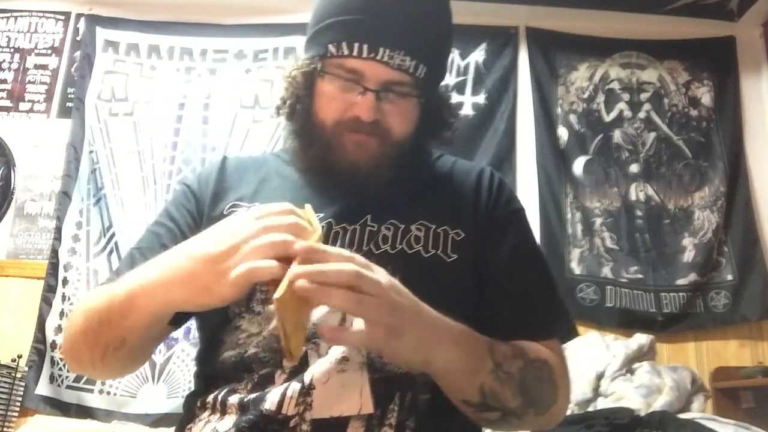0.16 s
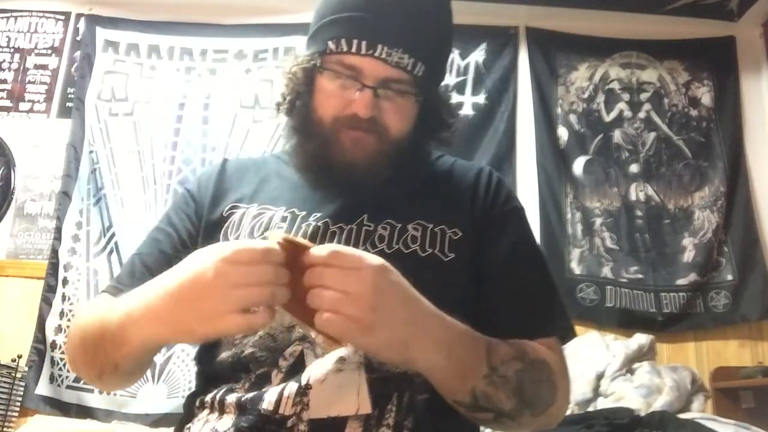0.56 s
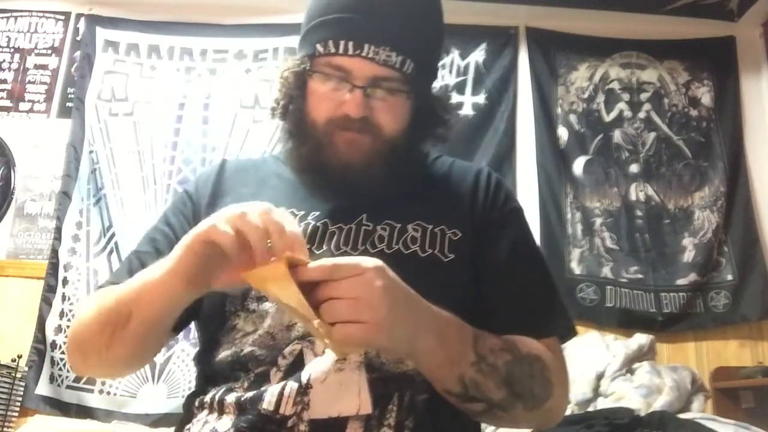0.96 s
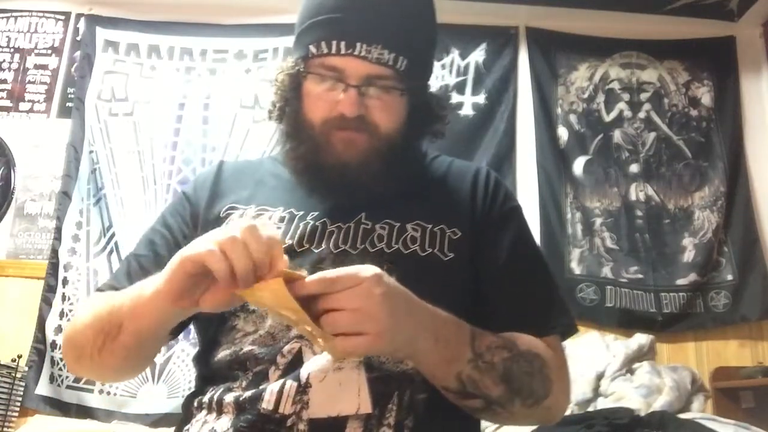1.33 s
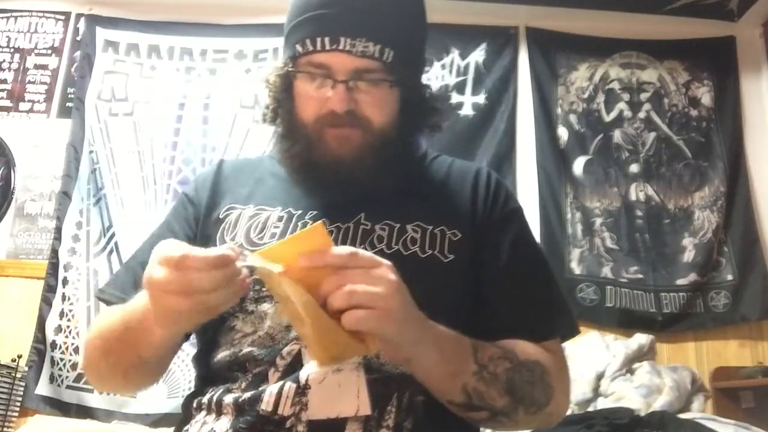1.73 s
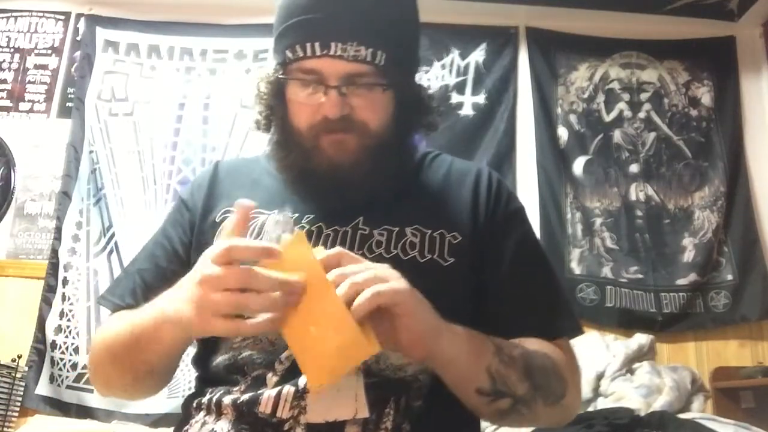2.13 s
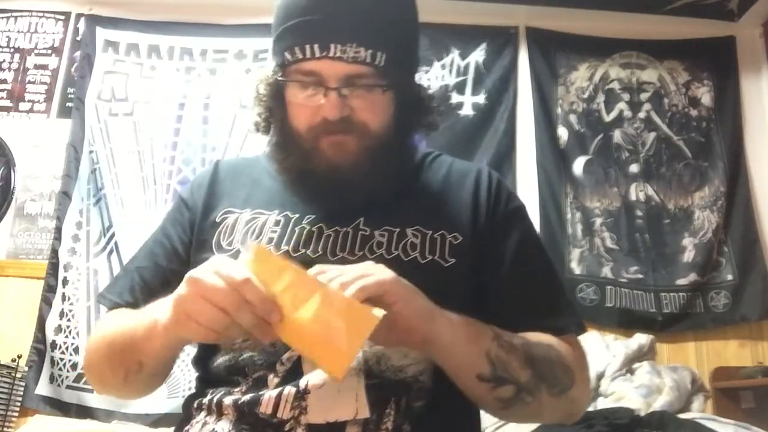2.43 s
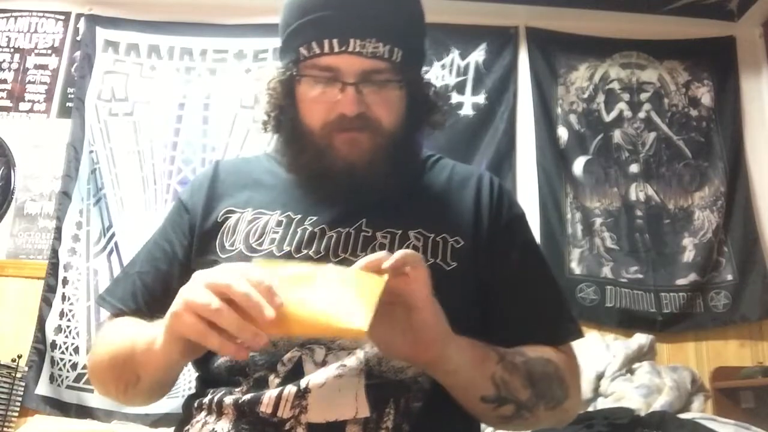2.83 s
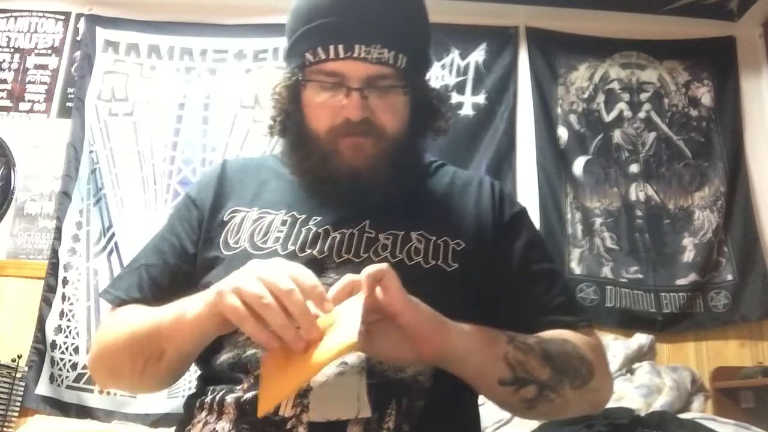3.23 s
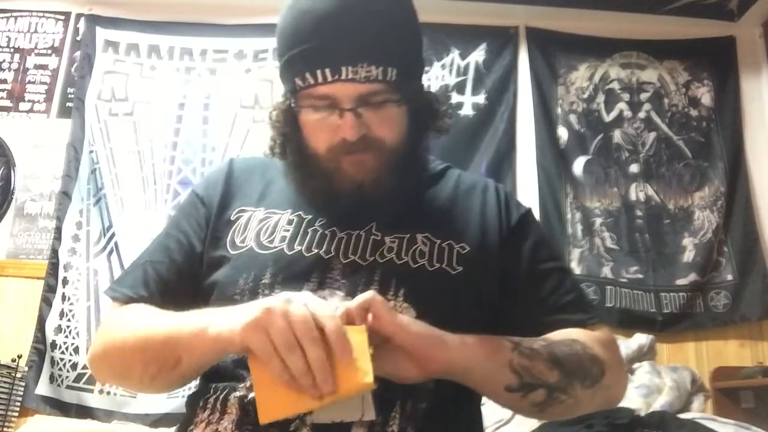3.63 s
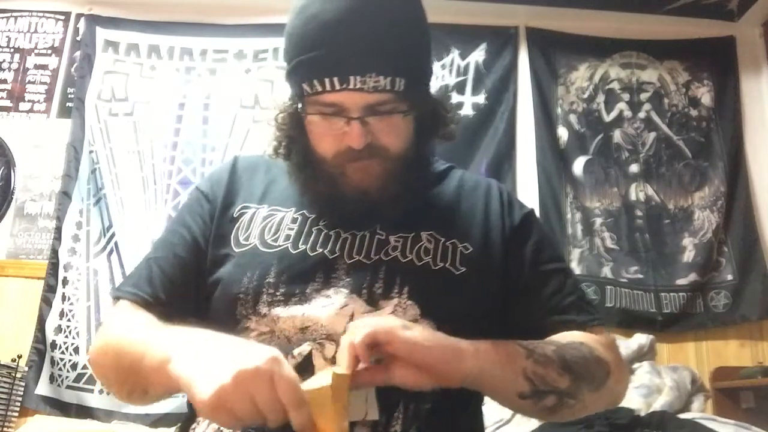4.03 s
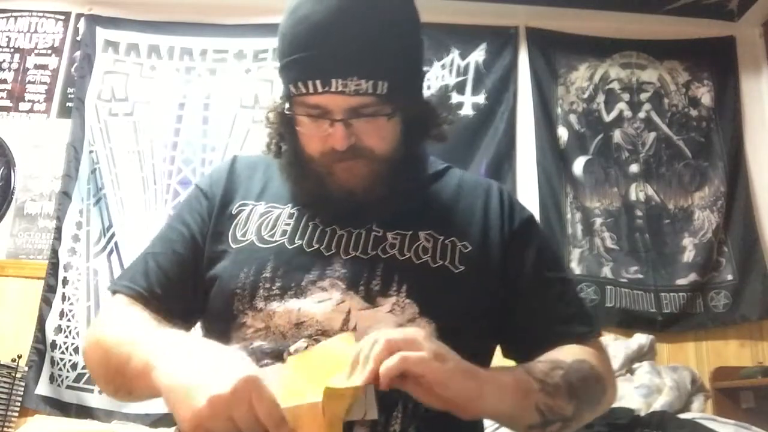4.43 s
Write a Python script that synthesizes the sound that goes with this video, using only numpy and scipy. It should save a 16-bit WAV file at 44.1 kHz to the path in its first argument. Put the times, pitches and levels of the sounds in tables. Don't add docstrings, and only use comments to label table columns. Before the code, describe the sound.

Irregular paper crinkling indoors: isolated hard snaps with short gaps, a brief rapid rip of parting fibres, then hollow pops and clicks as the opened envelope is flipped. The handling softens to dull dents and light rubbing, then a few firmer crackles and a thin paper-on-paper hiss. The microphone is fairly close, with short room reflections and a quiet background.

```python
import sys
import numpy as np
from scipy import signal
from scipy.fft import rfft, irfft
from scipy.io import wavfile
from scipy.ndimage import uniform_filter1d

SR = 44100
rng = np.random.default_rng(int(sys.argv[2]) if len(sys.argv) > 2 else 0)


def convert_level_to_amplitude(level_db):
    exponent = np.asarray(level_db, float) / 20
    return 10 ** exponent


def file_out(sig):
    cols = np.atleast_2d(sig).T
    lim = np.clip(cols, -1, 1)
    pcm = np.round(lim * 32767).astype(np.int16)
    wavfile.write(sys.argv[1], SR, pcm)


N = 201563


def unit(x):
    return x / np.sqrt(np.mean(x ** 2))


def band(x, lo_hz, hi_hz, order=3):
    sos = signal.butter(order, [lo_hz, hi_hz], "bandpass", fs=SR, output="sos")
    return signal.sosfilt(sos, x)


def tint(x, points):
    hz, db = np.transpose(points)
    grid = np.maximum(np.fft.rfftfreq(8192, 1 / SR), 1)
    ceps = irfft(np.log(convert_level_to_amplitude(np.interp(np.log(grid), np.log(hz), db))))
    ceps[1:4096] *= 2
    ceps[4097:] = 0
    response = irfft(np.exp(rfft(ceps)))
    return signal.fftconvolve(x, response)[:len(x)]


def fade(t, t60):
    return np.exp(-np.log(1000) * t / t60)


def place(times, shapes):
    out = np.zeros(N + shapes.shape[1])
    starts = (times * SR).astype(int)[:, None]
    np.add.at(out, starts + np.arange(shapes.shape[1]), shapes)
    return out[:N]


def set_peaks(shapes, db):
    return shapes * (convert_level_to_amplitude(db) / np.abs(shapes).max(axis=1))[:, None]


def walk(rate):
    hold = int(SR / rate)
    steps = np.repeat(rng.standard_normal(N // hold + 1), hold)[:N]
    return unit(uniform_filter1d(steps, hold))


# [dB per Hz, relative]
HUSH_COLOUR = [(22, -17), (40, -11), (55, 3), (110, -0.5), (400, -4.5), (900, -14), (1850, -12),
               (3200, -34), (6000, -13.5), (9000, -30.5), (15500, -21.5), (16000, -59)]


def hush():
    return unit(tint(rng.standard_normal(N), HUSH_COLOUR)) * convert_level_to_amplitude(-67)


# pitch_hz, t60_s
ROOM_DECAY = [(200, 0.21), (530, 0.19), (1400, 0.17), (3700, 0.14), (9700, 0.14)]


def room(x, wet_db, gap_s=0.0038):
    t = np.arange(SR // 3) / SR
    hz, t60 = np.transpose(ROOM_DECAY)
    tail = 0
    for mid_hz in 140 * 2 ** np.arange(7):
        widen = 1 + (mid_hz > 8000)
        hi_hz = min(mid_hz * 2 ** .5 * widen, 20000)
        noise = band(rng.standard_normal(len(t)), mid_hz / 2 ** .5, hi_hz)
        tail = tail + noise * fade(t, np.interp(np.log(mid_hz), np.log(hz), t60))
    tail = tail * np.clip(t / gap_s - 1, 0, 1)
    tail = tail / np.sqrt(np.sum(tail ** 2))
    return x + convert_level_to_amplitude(wet_db) * signal.fftconvolve(x, tail)[:N]


def shares(db, sharp_db, sparkle_db, sparkle_slope, thump_db, thump_slope):
    crack = db + sharp_db
    sparkle = db + sparkle_db + sparkle_slope * sharp_db
    thump = db + thump_db + thump_slope * sharp_db
    return crack, db, sparkle, thump


# low_hz, high_hz
BANDS_HZ = [(3200, 9400), (950, 2900), (9000, 16000), (200, 900)]
BAND_SLOPES_DB = [1, -0.13, -0.89, -0.93]


def crackle(gains, rate, scatter_db, smooth, patchy_db):
    chance = rng.random((N, 2))
    tick_db = np.minimum(-scatter_db * np.log(chance[:, 1] + 1e-9), 4 * scatter_db)
    ticks = (chance[:, 0] < rate / SR) * convert_level_to_amplitude(tick_db)
    kick = np.sign(chance[:, 0] * SR / rate - .5)
    out = 0
    for edges, gain, slope_db in zip(BANDS_HZ, gains, BAND_SLOPES_DB):
        noise = rng.standard_normal(N)
        rub = unit(ticks * (noise + kick)) + smooth * noise
        cuts = np.geomspace(*edges, 5)
        patches = 0
        for lo, hi in zip(cuts, cuts[1:]):
            swell_db = patchy_db * walk(rate=50.0) + slope_db * np.log2(lo / edges[0])
            patches = patches + convert_level_to_amplitude(swell_db) * band(rub, lo, hi, order=2)
        out = out + gain * unit(patches)
    return out


# time_s, level_db
SLIDE = [
    (4.08, -82),
    (4.27, -62),
    (4.44, -60),
    (4.57, -68),
]
# pitch_hz, width_hz, level_db
SLIDE_MODES = [(2150, 290, -13.5), (4080, 940, -7.5), (5900, 1300, -5), (8600, 1500, -11)]


def slide():
    s, db = np.transpose(SLIDE)
    noise = rng.standard_normal(N)
    hiss = 0
    for hz, width_hz, mode_db in SLIDE_MODES:
        hiss = hiss + convert_level_to_amplitude(mode_db) * unit(band(noise, hz - width_hz / 2, hz + width_hz / 2))
    level_db = np.interp(np.arange(N) / SR, s, db, left=-120)
    return unit(hiss) * convert_level_to_amplitude(level_db + 7.5)


# time_s, effort_db, sharpness_db
RUSTLE = [(0.0, -41.5, -1), (.22, -51.5, -6), (.69, -55, 6), (.83, -71.5, 0), (1.12, -49, -2),
          (1.28, -78, -5), (1.42, -44, -32), (1.551, -27, 6.5), (1.78, -69.5, -21.5), (2.19, -54.5, 4.5),
          (2.52, -38.5, -8), (2.74, -46.5, 1.5), (3.14, -51.5, -4.5), (3.28, -62, 5.5), (3.84, -43, -8),
          (3.97, -46.5, -4.5), (4.4, -61.5, 12.5), (4.57, -53, -19)]
# sparkle_db, slope [dB per dB of sharpness], thump_db, slope [dB per dB]
RUSTLE_EDGES = (-9.5, 2.2, -8.5, 2.2)


def rustle():
    s, effort_db, sharp_db = np.transpose(RUSTLE)
    t = np.arange(N) / SR
    grip_db = 3.0 * walk(rate=25.)
    gains = []
    for db in shares(effort_db, sharp_db, *RUSTLE_EDGES):
        gains.append(convert_level_to_amplitude(np.interp(t, s, db) - 14.5 + grip_db + 2.5 * walk(rate=46.0)))
    return crackle(gains, rate=630.0, scatter_db=3.0, smooth=1.0, patchy_db=3.)


# start_s, level_db, pitch_hz, t60_s
THUDS = [(1.57, -25, 300, .03), (1.581, -30, 240, .025), (1.576, -30, 150, .05), (1.728, -32, 150, .05),
         (1.745, -40, 250, .035), (2.768, -55, 1340, .12), (.785, -40, 260, .04), (4.49, -40, 330, .05),
         (2.5, -41, 135, .07), (4.062, -48, 360, .16), (2.168, -38, 270, .04), (3.68, -39, 210, .05),
         (.405, -40, 270, .04), (3.495, -48, 950, .12), (0.408, -40, 150, .06), (2.165, -40, 170, .06),
         (4.5, -38, 140, .08)]


def thuds():
    s, db, hz, t60 = np.transpose(THUDS)
    t = np.arange(9000) / SR
    soft_start = 1 - np.exp(-t / 0.0079)
    ring = np.sin(2 * np.pi * hz[:, None] * t) * fade(t, t60[:, None]) * soft_start
    return place(s, set_peaks(ring, db)) * convert_level_to_amplitude(3. * walk(rate=60.))


# start_s, peak_db, pitch_hz
POPS = [(.043, -46, 504), (.086, -44, 555), (.119, -44, 496), (0.406, -31, 440), (0.45, -38, 600),
        (0.584, -48, 590), (0.733, -32.5, 920), (0.796, -32.5, 950), (0.946, -49, 490), (0.985, -50.5, 514),
        (1.032, -47, 650), (1.725, -22.5, 940), (1.829, -39.5, 736), (1.862, -45.5, 466), (1.935, -22, 917),
        (2.16, -31, 830), (2.285, -37.5, 604), (2.33, -38, 320), (2.388, -29, 525), (2.605, -29, 540),
        (3.067, -39, 473), (3.273, -41.5, 452), (3.476, -42.5, 380), (3.678, -30, 520), (3.729, -42, 926),
        (4.298, -25.5, 910), (4.477, -26.5, 650), (4.519, -44, 820)]


def pops():
    s, db, hz = np.transpose(POPS)
    t = np.arange(2200) / SR
    turn = 2 * np.pi * hz[:, None] * t
    luck = rng.random((len(s), 2))
    near_mode = np.sin(turn * (0.975 + 0.22 * luck[:, :1]))
    low_mode = np.sin(turn * (0.64 + 0.22 * luck[:, 1:]))
    ring = np.sin(turn) + 0.77 * near_mode + 0.77 * low_mode
    ring = ring * fade(t * hz[:, None], 7.) * (1 - np.exp(-t / 0.011))
    return place(s + .0022, set_peaks(ring, db + 2.5))


# start_s, length_s, panel_db, sharpness_db
RIPS = [(0.006, 0.054, -53.5, -4.5), (0.114, 0.049, -48.5, -3), (0.251, 0.035, -53.5, 0.5),
        (0.485, 0.014, -33.5, -10), (0.565, 0.048, -84.5, 15), (0.685, 0.16, -53, -3.5),
        (0.747, 0.047, -50, -3), (1.12, 0.022, -52.5, 9.5), (1.244, 0.092, -42.5, 7),
        (1.333, 0.059, -53.5, 3.5), (1.423, 0.038, -56.5, 10.5), (1.503, .075, -39.5, 7),
        (2.01, 0.26, -58, 0.5), (2.263, 0.073, -44, 0), (2.523, 0.053, -54, -4),
        (2.957, 0.046, -49.5, -15.5), (3.046, 0.066, -48, 0), (3.243, 0.082, -58, 0.5),
        (3.455, 0.075, -49, -9.5), (3.589, 0.042, -53, 5), (3.664, .11, -43, -5.5),
        (3.772, 0.12, -49.5, -8), (3.979, 0.13, -55, -0.5), (4.292, 0.027, -39.5, 1), (4.426, 0.11, -51, 0),
        (4.534, 0.053, -37, -1.5)]
# sparkle_db, slope [dB per dB of sharpness], thump_db, slope [dB per dB]
RIP_EDGES = (0.5, 2, -4.5, -0.57)


def rips():
    s, length, panel_db, sharp_db = np.transpose(RIPS)[:, :, None]
    levels = shares(panel_db, sharp_db, *RIP_EDGES)
    t = np.arange(N) / SR
    edge_s = np.minimum(0.013 * convert_level_to_amplitude(0.53 * (-37.5 - levels[0])), length)
    on = np.clip(np.minimum((t - s) / 1.94, s + length - t) / edge_s + .5, 0, 1) ** 2
    jerk_db = 1.08 * walk(rate=420.0)
    gains = [convert_level_to_amplitude(jerk_db + 2.0 * walk(rate=100.0)) * (convert_level_to_amplitude(db[:, 0]) @ on) for db in levels]
    return crackle(gains, rate=2000., scatter_db=4.5, smooth=0.5, patchy_db=1.8)


def ticks(table, cycles, rise, fizz, trim_db):
    s, db, hz = np.transpose(table)
    lead = 120
    t = (np.arange(600) - lead) / SR
    turns = hz[:, None] * t
    luck = rng.random((len(s), 2))
    swell = np.where(turns < 0, np.exp(-(turns / rise) ** 2), fade(np.maximum(turns, 0), cycles))
    flip = (luck[:, :1] > .5) / 2
    ring = np.sin(2 * np.pi * (turns + 0.21 + flip))
    ring = ring + 0.16 * np.sin(2 * np.pi * turns * (1.19 + 1.4 * luck[:, 1:]))
    speck = np.diff(rng.standard_normal((len(s), len(t) + 1))) * np.exp(-np.abs(t) / 0.00018)
    return place(s - lead / SR, set_peaks(ring * swell + fizz * speck, db + trim_db))


# start_s, peak_db, pitch_hz
FIBRES = [(1.2543, -18, 4080), (1.2575, -12.5, 5900), (1.2602, -25, 4610), (1.2642, -24, 5600),
          (1.2699, -12, 4270), (1.2754, -39, 4500), (1.2783, -28, 5680), (1.2814, -19, 4350),
          (1.2857, -17, 4290), (1.2937, -7.5, 5400), (1.2968, -8, 5530), (1.303, -15, 7300),
          (1.3061, -15, 5940), (1.3168, -21, 9970), (1.3242, -16, 4290), (1.3282, -22, 5060),
          (1.3315, -17, 4690), (1.3697, -31, 5100), (1.3745, -21, 4260), (1.3921, -19, 4330),
          (1.3964, -11.5, 4460), (1.4, -15.5, 4130), (1.4049, -4.5, 4230), (1.4086, -9, 4080),
          (1.4111, -18, 4240), (1.4165, -28, 3680), (1.4287, -21, 4200), (1.4313, -17, 4110),
          (1.4354, -17, 4130), (1.4389, -14.5, 4180), (1.4431, -24, 4370), (1.4512, -16, 6980),
          (1.4601, -15, 5560), (1.4742, -17, 5640), (1.479, -27, 4640), (1.4835, -26, 3830),
          (1.5021, -34, 4840), (1.505, -15, 5280), (1.512, -29, 4300), (1.5155, -27, 3960),
          (1.5193, -6.5, 7340), (1.5221, -16, 5840), (1.5269, -19, 4430), (1.5339, -13, 4200),
          (1.5383, -7, 8070), (1.5412, -1, 8070), (1.544, -24, 4350), (1.5471, -28, 4300),
          (1.5552, -18, 4050), (1.561, -31, 5790), (1.5647, -17, 4100), (1.5672, -9.5, 6400),
          (1.5711, -12, 4050), (1.5762, -22, 4300), (1.5949, -32, 4160)]
# start_s, peak_db, pitch_hz
FACETS = [(0.1316, -22.5, 3020), (0.3411, -14, 4100), (0.3454, -32, 3270), (0.3562, -16.5, 3000),
          (0.3736, -30, 3230), (0.4066, -19.5, 4060), (0.4891, -31, 4570), (0.4988, -10, 4130),
          (0.5058, -24, 3670), (0.276, -38, 5860), (0.7368, -19, 4400), (0.7482, -40, 5570),
          (0.7524, -27, 3120), (0.7837, -40, 4100), (0.7958, -17, 5900), (0.802, -28, 4300),
          (1.0769, -38.5, 5500), (1.1278, -12, 11330), (1.1372, -41, 4390),
          (1.6795, -34, 4180), (1.6988, -33, 3060), (1.7119, -37, 3800), (1.7287, -4.5, 6720),
               (1.7366, -21, 5770), (1.747, -30, 7100), (1.938, -32, 3700), (2.041, -31, 4050),
               (2.0727, -14.5, 7460), (2.082, -12, 5670), (2.0941, -29, 3530), (2.1627, -27, 4100),
               (2.179, -33, 4260), (2.2655, -19.5, 6950), (2.2861, -30, 5770), (2.303, -26, 6140),
               (2.306, -20.5, 4900), (2.31, -25, 6140), (2.3498, -25, 3100), (2.3875, -24, 4280),
               (2.4634, -31, 3050), (2.513, -27, 3080), (2.5311, -16, 3970), (2.5361, -20, 3400),
               (2.5468, -20, 6330), (2.5521, -21, 5340), (2.5706, -14, 7500), (2.577, -25, 5380),
               (2.6062, -27, 4500), (2.6139, -25, 5300), (2.623, -20, 3680), (2.651, -35, 5700),
               (2.6662, -11.5, 3870), (2.678, -13, 3430), (2.6825, -18.5, 3100), (2.768, -25, 3040),
               (2.9906, -31, 3930), (3.0918, -27, 6400), (3.181, -49, 5300), (3.4977, -22.5, 5700),
               (3.6784, -38, 3100), (3.696, -24, 4080), (3.7093, -31, 5050), (3.743, -21, 3600),
               (3.8107, -29.5, 3790), (3.8418, -22, 3160), (3.895, -20.5, 3730), (4.012, -44, 3200),
               (4.0554, -31, 6520), (4.3008, -21, 3660), (4.3078, -19, 5800), (4.3124, -19, 6000),
               (4.3178, -19.5, 3170), (4.3318, -29, 3380), (4.4767, -18, 3100), (4.5518, -17.5, 3200),
               (4.5583, -22, 3220), (4.5666, -33, 4090)]
# start_s, peak_db, pitch_hz
DENTS = [(2.2919, -27, 1300), (2.3298, -28, 2130), (2.4153, -45, 1820), (2.472, -40, 1340),
         (2.5188, -28, 1050), (2.6205, -40, 1460), (2.6453, -30, 720), (2.6824, -19, 1130),
         (2.7269, -40, 1280), (2.9242, -25, 1720), (3.0812, -26.5, 1830), (3.0928, -29, 2240),
         (3.1055, -27, 2020), (3.2041, -41, 1990), (3.259, -32, 1900), (3.4666, -30, 1440),
         (3.5087, -39, 1710), (3.5265, -28.5, 1490), (3.6144, -31, 2200), (3.6666, -30, 1750),
         (3.7314, -27, 2150), (3.7696, -34, 1350), (3.7765, -36, 1400), (3.8177, -36, 1380),
         (3.9024, -27, 2010), (3.9154, -33, 1850), (4.0336, -30, 1870), (4.1232, -37.5, 1610),
         (4.2739, -31.5, 1570), (4.3244, -36, 1200), (4.4333, -32, 1870), (4.4911, -25, 1590),
         (4.5041, -22.5, 750), (4.5227, -33, 1660), (4.5337, -30, 1830)]
FLICK_CYCLES = (14., 16., 12.)


def flicks():
    fibre_cycles, facet_cycles, dent_cycles = FLICK_CYCLES
    fibres = ticks(FIBRES, fibre_cycles, rise=0.91, fizz=0.78, trim_db=-1.5)
    facets = ticks(FACETS, facet_cycles, rise=0.58, fizz=0.26, trim_db=-4.0)
    dents = ticks(DENTS, dent_cycles, rise=0.57, fizz=0.046, trim_db=-7.0)
    return fibres + facets + dents


# start_s, ring_db, pitch_hz, sharpness_db
GRIP = [(.0877, -37, 1590, -20), (.1323, -21, 1620, -30), (.1446, -28, 1640, -32), (.1748, -36.5, 2160, 1),
        (.2662, -37, 1760, 2), (.3411, -7.5, 1865, 3), (.406, -22, 1760, -1.5), (.4499, -27.5, 2420, -13),
        (.4896, -20.5, 1193, -9), (.499, -15.5, 2100, 8.5), (.7226, -28, 1200, -14),
        (.7369, -8.5, 2460, -1), (.7842, -22.5, 1450, -8), (.7969, -20, 1487, 4.5), (.8252, -42, 1620, 4),
        (.949, -55.5, 1020, -17), (1.0165, -41.5, 1100, -9), (1.0765, -58, 1910, 24.5),
        (1.1265, -37.5, 1950, 9), (1.1371, -28, 1980, -2), (1.2197, -70.5, 1920, 31.5),
        (1.231, -55, 2480, 9)]
# start_s, ring_db, pitch_hz, sharpness_db
TEAR = [(1.276, -29, 1960, 14.5), (1.2826, -24, 1710, 11), (1.2976, -22, 1420, 10.5),
        (1.3159, -20, 1435, 10), (1.3237, -23, 1650, 8), (1.37, -27.5, 1600, 4.5), (1.391, -26, 2430, -5),
        (1.398, -31.5, 1460, 10.5), (1.4039, -9, 2390, 2), (1.428, -48, 2030, 21), (1.439, -22, 1550, 0),
        (1.46, -37, 2210, 13), (1.4733, -24.5, 2170, 10), (1.4782, -43, 2590, 21.5),
        (1.5022, -31, 1580, 14), (1.5116, -13.5, 1570, 6.5), (1.5224, -24.5, 1680, 15),
        (1.537, -35, 1680, -12), (1.5634, -17.5, 1400, 8), (1.5697, -16, 2060, 0),
        (1.6792, -21.5, 2000, -4.5), (1.699, -7, 2710, -2.5), (1.7286, -9.5, 2620, 3)]
# start_s, ring_db, pitch_hz, sharpness_db
TURN = [(1.8193, -30.5, 1630, -14), (1.83, -29, 1740, -16), (1.854, -41, 2210, -19),
        (1.8647, -38, 2000, -5), (1.881, -40.5, 1780, -20), (1.9354, -23.5, 1450, -0.5),
        (1.938, -12, 1740, -2.5), (2.033, -43.5, 2690, 10.5), (2.0427, -34, 2600, 6.5),
        (2.068, -28, 1680, -9), (2.073, -19, 1790, -0.5), (2.0827, -17, 1650, 5.5), (2.124, -42, 1790, -16),
        (2.1644, -9.5, 2334, 1.5), (2.1877, -33.5, 2330, 2.5), (2.2456, -47, 2190, 7),
        (2.2646, -56, 2690, 26), (2.28, -28, 1780, -5), (2.3141, -25.5, 1780, -13),
        (2.3484, -28.5, 1910, -0.5), (2.3905, -17.5, 2070, 1), (2.461, -17.5, 2720, -12),
        (2.511, -25, 1360, -3), (2.5301, -14.5, 1340, 1.5), (2.5457, -21.5, 1420, 1),
        (2.5713, -30.5, 1640, 12), (2.6075, -8.5, 1280, 1.5), (2.65, -24, 1240, 4),
        (2.6634, -19.5, 2550, 5), (2.6669, -12, 1330, 7.5)]
# start_s, ring_db, pitch_hz, sharpness_db
FEEL = [(2.7666, -25.5, 1445, -8.5), (2.8596, -37.5, 1320, -27), (2.8959, -21.5, 1300, -8),
        (2.9171, -33, 2200, -5), (2.9286, -22.5, 1410, -10), (2.9742, -35, 1340, -21),
        (2.9881, -25, 1580, -6.5), (3.011, -37, 1450, 0), (3.0584, -30, 1900, -12),
        (3.138, -27.5, 1630, -10), (3.196, -26, 2160, -22), (3.266, -30, 1760, -5), (3.2941, -32, 1860, -7),
        (3.3287, -26.5, 1986, -11.5), (3.439, -20, 1830, -46), (3.476, -37, 1800, -15),
        (3.4977, -27, 1800, 4.5), (3.5445, -29.5, 1930, -33)]
# start_s, ring_db, pitch_hz, sharpness_db
EMPTY = [(3.6785, -26.5, 980, -22), (3.695, -22, 2220, -4), (3.7099, -24, 2100, 4),
         (3.7407, -27.5, 2360, 4), (3.755, -23.5, 2200, -21), (3.8098, -26, 2080, -21),
         (3.8334, -27.5, 1980, -10), (3.8415, -32.5, 1150, -9), (3.8946, -24.5, 1570, -5),
         (4.0121, -28.5, 1345, 1), (4.056, -33, 2250, 0), (4.25, -47, 1500, -10), (4.301, -18, 1260, -1),
         (4.311, -17.5, 1600, -2.5), (4.4324, -35, 1030, -14), (4.4763, -22.5, 954, -5),
         (4.551, -18.5, 1920, -19), (4.5665, -15, 2040, -1)]
# sparkle_db, thump_db [both against the ring]
HOLD_DB = [
    (-15.5, -17.5),
    (-6.5, -22.5),
    (-8, -19),
    (-9.5, -14.5),
    (-11, -19.5),
]


def snaps():
    actions = GRIP, TEAR, TURN, FEEL, EMPTY
    s, db, hz, sharp_db = np.transpose(sum(actions, []))
    fizz_db, hollow_db = np.repeat(HOLD_DB, [len(a) for a in actions], axis=0).T
    crack_db, ring_db, sparkle_db, thump_db = shares(db, sharp_db, fizz_db, 1.71, hollow_db, 0.013)
    lead = 100
    t = (np.arange(1400) - lead) / SR
    luck = rng.random((len(s), 9))
    creak_s = 0.00012 + 0.0005 * luck[:, 2:3] ** 2
    burst = rng.standard_normal((len(s), len(t))) * np.exp(np.minimum(t, 0) / creak_s)
    grains = rng.standard_normal((len(s), len(t) // 20))
    burst *= convert_level_to_amplitude(4. * np.repeat(grains, 20, axis=1))
    burst[:, lead] += np.clip(9 + .3 * db, 0, 6)
    t = np.maximum(t, 0)
    crack = band(burst * (fade(t, 0.0013) + 0.4 * fade(t, 0.035)), *BANDS_HZ[0])
    sparkle = band(burst * (fade(t, 0.01) + 0.11 * fade(t, 0.021)), *BANDS_HZ[2])
    turn = 2 * np.pi * hz[:, None] * t * (1.04 - 12. * t)
    ring = np.sin(turn) + 0.39 * np.sin(turn * (0.601 + 0.27 * luck[:, :1]))
    ring = ring + 0.51 * np.sin(turn * (0.983 + 0.78 * luck[:, 7:8]))
    cycles = t * hz[:, None]
    ring = ring * (np.exp(-(cycles / (3.2 + 1.6 * luck[:, 1:2])) ** 2) + .2 * fade(cycles, 25))
    rise_s = 0.0001 * convert_level_to_amplitude(-1.1 * np.clip(db + 10, -18, 0))[:, None]
    ring = ring * (1 - np.exp(-t / rise_s))
    rough = convert_level_to_amplitude(0.087 * np.clip(sharp_db, -30, 0))[:, None]
    ring = ring + rough * band(burst * fade(t, .02), *BANDS_HZ[1])
    thump = band(burst * fade(t, 0.047), *BANDS_HZ[3])
    shape = set_peaks(crack, crack_db - 3.0) + set_peaks(ring, ring_db - 4.0)
    shape = shape + set_peaks(sparkle, sparkle_db + 0.088) + set_peaks(thump, thump_db)
    return place(np.maximum(s - lead / SR, 0), shape)


# pitch_hz, level_db
COLOUR = [(100, -21.5), (400, -2.5), (1050, -2), (1300, 5), (1900, 4.5), (3300, -1.5), (4200, 3.5),
          (7000, 0.5), (8500, -8.5), (10500, -10), (13300, -6), (15500, -13), (16200, -69)]


def scene():
    paper = snaps() + rips() + rustle() + slide() + thuds() + pops() + flicks()
    paper = tint(room(paper, wet_db=-10.0), COLOUR)
    return (paper + hush())[None]


def band_limit(x):
    return signal.sosfilt(signal.butter(12, 16840, fs=SR, output="sos"), x)


def record(dry):
    return band_limit(dry)


dry = scene()
out = record(dry)
file_out(out)
```